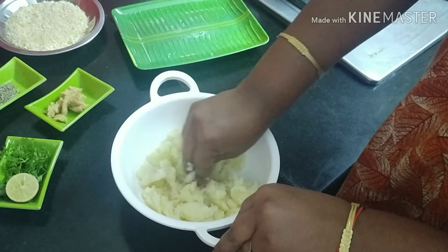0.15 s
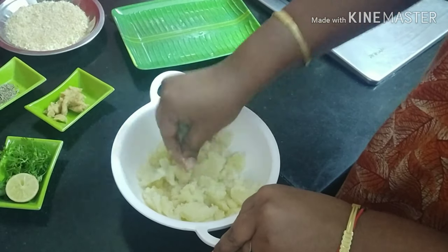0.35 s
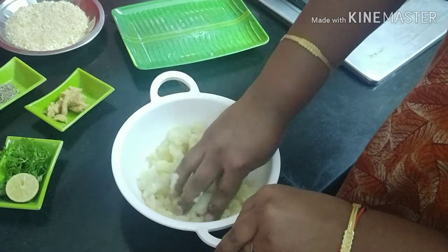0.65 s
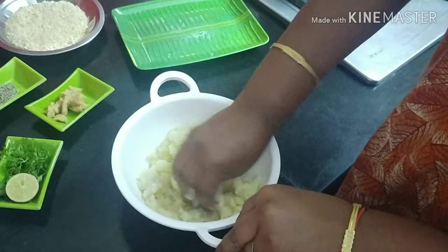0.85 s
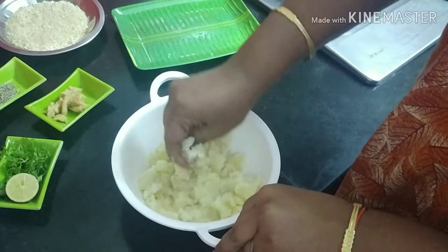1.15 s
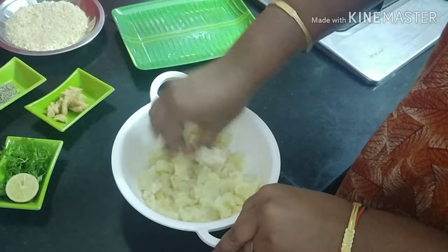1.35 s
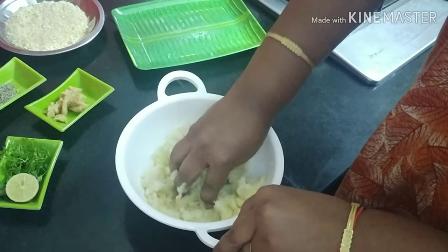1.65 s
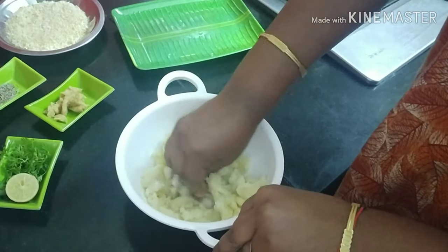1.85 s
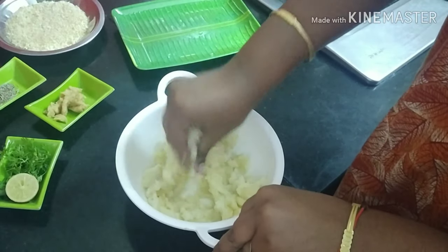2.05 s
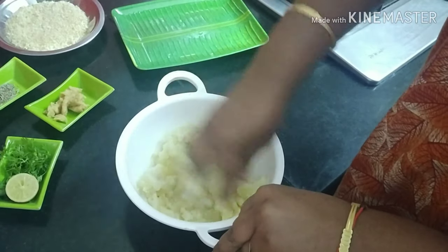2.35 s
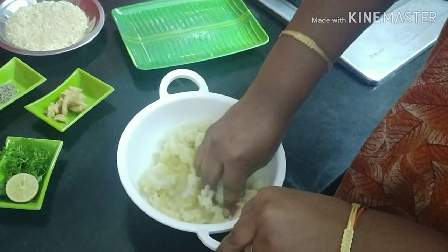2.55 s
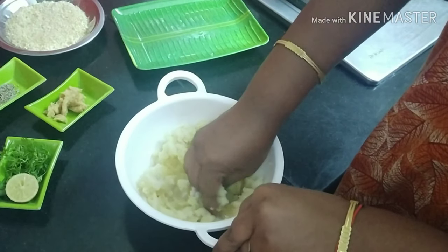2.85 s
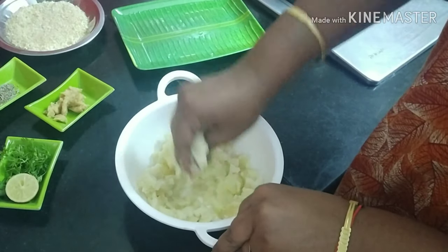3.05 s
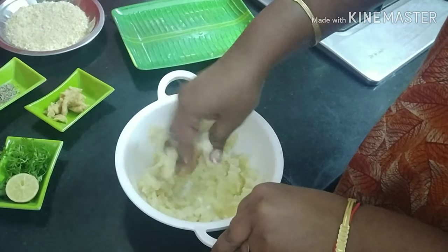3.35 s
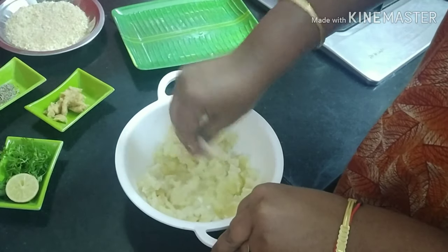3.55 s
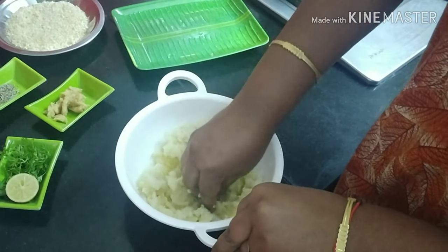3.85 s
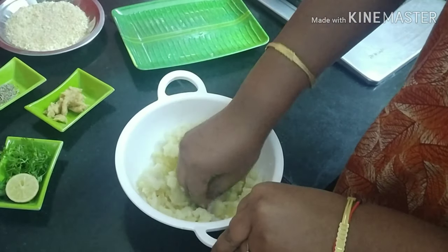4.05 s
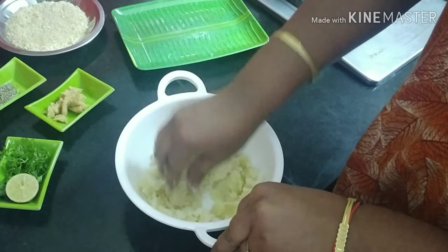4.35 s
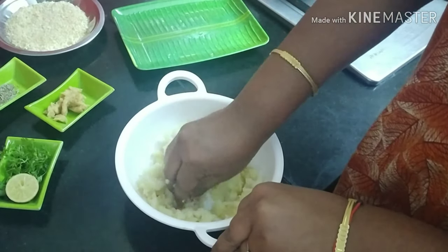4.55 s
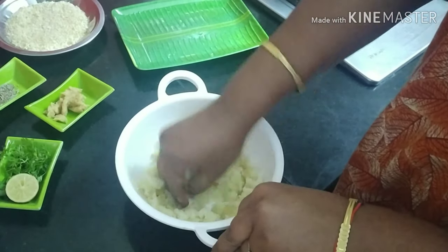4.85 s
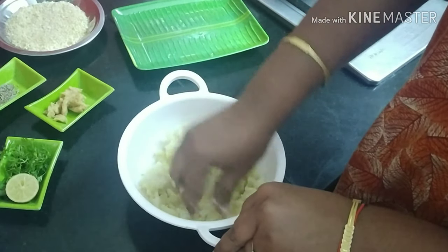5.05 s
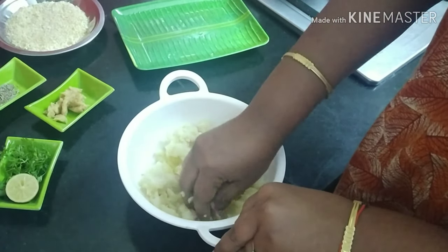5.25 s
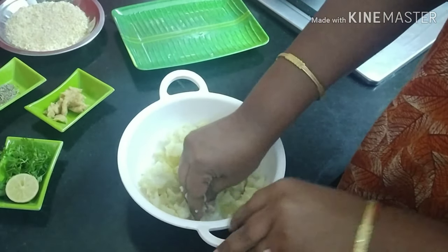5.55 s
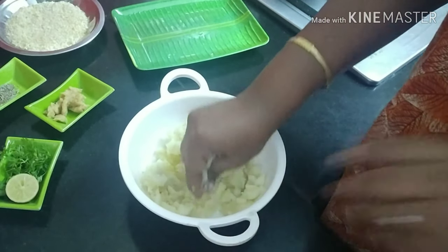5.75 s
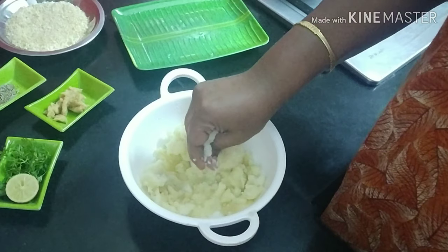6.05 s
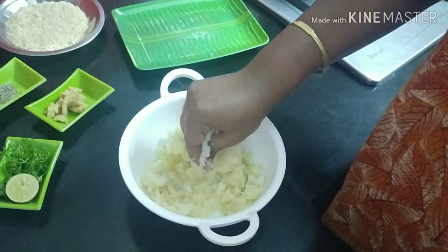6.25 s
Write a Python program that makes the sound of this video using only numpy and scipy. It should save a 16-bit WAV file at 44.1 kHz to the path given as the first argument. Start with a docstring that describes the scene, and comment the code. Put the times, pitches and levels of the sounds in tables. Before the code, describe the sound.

A close, quiet kitchen sound with short, hard reflections. From the start a hand mashes soft boiled potatoes in a plastic bowl: fine wet crackles, smeary slides and dull finger rubs come in uneven pulses, with a rub around 0.8 s and crisp sticky pops near 1.2 s. At 1.67 s the bowl knocks once, a sharp, hollow plastic crack, by far the loudest event, ringing briefly. A strong smear and pop follow at 1.9 s, with soft low bumps and a hum swell around 2 s. Squeezing continues, with smears at 3.1 and 3.8 s, a light tap at 3.9 s, and a bright pop and tick about 4.55 s. Tiny metallic bracelet clinks gather around 5.05 s. From 5.3 s it grows sparse, with a faint tap and tone, until small rubs and squeezes at 6.0-6.3 s. Low wavering hum, rumble and faint hiss persist underneath.

```python
"""Stone kitchen counter: a hand mashes soft boiled potatoes in a plastic bowl.
Squeezes and slides are coloured random clicks: wet crackle, paste smear, rub on plastic; noise bursts pop.
The bowl is tapped and knocks once: contact snap, noise crack, decaying modes. A bracelet clinks likewise.
A small hard room adds echoes and a tail; below lie faint tones, a wavering hum, low bumps and shaped noise."""
import sys
import numpy as np
from scipy import signal
from scipy.fft import rfft, irfft, next_fast_len
from scipy.io import wavfile

SR = 44100
rng = np.random.default_rng(int(sys.argv[2]) if len(sys.argv) > 2 else 0)


def dump_mix(stems):
    """Bounce the given channels to the path in sys.argv[1] as a 16-bit WAV at rate SR."""
    frames = np.atleast_2d(stems).T  # one column per channel
    limited = np.clip(frames, -1, 1)  # hard clip at full scale
    pcm = np.round(limited * 32767).astype(np.int16)
    wavfile.write(sys.argv[1], SR, pcm)


N = 281799
TIME = np.arange(N) / SR
TOP_HZ = 15700


def undb(db):
    """Decibels to amplitude gain."""
    return 10 ** (np.asarray(db) / 20)


def unit(x):
    """Scale to rms 1."""
    return x / np.sqrt(np.mean(x ** 2))


def at(points, hz):
    """Interpolate (frequency, value) points on a log-frequency axis."""
    point_hz, value = np.transpose(points)
    return np.interp(np.log(np.maximum(hz, 1)), np.log(point_hz), value)


def colour(x, points):
    """Filter x by a (frequency, level) curve, then scale to rms 1."""
    size = next_fast_len(len(x))
    gain = undb(at(points, np.fft.rfftfreq(size, 1 / SR)))
    return unit(irfft(rfft(x, size) * gain, size)[:len(x)])


def bell(hz, centre_hz, octaves):
    """Gaussian weight on a log-frequency axis; octaves is its standard deviation."""
    return np.exp(-.5 * (np.log2(np.maximum(hz, 1) / centre_hz) / octaves) ** 2)


def band(x, centre_hz, octaves):
    """Keep one bell-shaped band of x."""
    weight = bell(np.fft.rfftfreq(len(x), 1 / SR), centre_hz, octaves)
    return irfft(rfft(x) * weight, len(x))


def walk(knots_per_s):
    """Straight lines between random normal knots."""
    knots = rng.standard_normal(int(N / SR * knots_per_s) + 2)
    return np.interp(TIME * knots_per_s, np.arange(len(knots)), knots)


def add(out, start_s, sound):
    """Mix a sound in at a time."""
    i = max(int(start_s * SR), 0)
    out[i:i + len(sound)] += sound[:max(N - i, 0)]


def fade(t, t60_s):
    """Exponential decay, 60 dB per t60."""
    return np.exp(-np.log(1000) * t / t60_s)


def envelope(start_s, length_s, attack_s, t60_s):
    """Sine-squared rise, hold until the length is over, exponential decay."""
    t = TIME - start_s
    rise = np.sin(np.pi / 2 * np.clip(t / min(attack_s, length_s), 0, 1)) ** 2
    return rise * fade(np.maximum(t - length_s, 0), t60_s)


def ring(modes, t, centre_hz, octaves, share):
    """Struck modes weighted by the contact band; touch scales every t60 by share."""
    out = np.zeros(len(t))
    for k, (hz, db, t60_s) in enumerate(modes):
        gain = (-1) ** k * undb(db) * bell(hz, centre_hz, octaves)  # neighbours in opposite senses
        out += gain * fade(t, t60_s * share) * np.cos(2 * np.pi * hz * t + np.pi / 4)
    return out


def grains(per_s, spread_db):
    """Random clicks of either sign; levels vary exponentially by spread_db, capped at 4 spreads."""
    size = undb(spread_db * np.minimum(rng.exponential(size=N), 4))
    return (rng.random(N) < per_s / SR) * size * rng.choice([-1, 1], N)


def swells(rows):
    """Sines under a raised-cosine window."""
    out = np.zeros(N)
    for start_s, db, hz, length_s in rows:
        t = TIME[:int(length_s * SR)]
        add(out, start_s, undb(db) * np.hanning(len(t)) * np.sin(2 * np.pi * hz * t))
    return out


# fingers closing on the mash: (time [s], length [s], relative wet-crackle level [dB])
SQUEEZES = [(-.03, 0.028, -63), (0.092, 0.43, -74.5), (0.494, 0.49, -64), (1.048, 0.16, -68),
            (1.407, 0.43, -69), (1.769, 0.23, -68), (2.132, 0.12, -68.5), (2.326, 0.07, -64),
            (2.465, 0.12, -66), (2.673, 0.047, -70), (2.813, 0.24, -70.5), (3.0, 0.13, -65.5),
            (3.113, 0.089, -70.5), (3.452, 0.28, -69.5), (3.747, 0.14, -71.5), (3.853, 0.056, -62),
            (4.104, 0.37, -69), (4.517, 0.14, -64), (4.753, 0.24, -69), (5.101, 0.38, -74),
            (6.156, .1, -73.5), (6.298, 0.083, -63.5)]


def grip():
    """Squeeze envelopes, power-summed: quick closing, slower release."""
    power = np.zeros(N)
    for start_s, length_s, db in SQUEEZES:
        power += (undb(db) * envelope(start_s, length_s, attack_s=0.044, t60_s=.5)) ** 2
    return np.sqrt(power)


# hand sliding on the bowl wall:
# (time of hardest push [s], build-up [s], relative smear level [dB], relative rub level [dB])
SLIDES = [(.6, .12, -72, -76), (.77, 0.19, -66.5, -66.5), (.87, 0.093, -68, -75), (.98, 0.14, -64.5, -80),
          (1.2, .04, -72, -95), (1.93, .06, -60, -67.5), (3.07, 0.087, -59.5, -72), (3.8, 0.061, -61, -70),
          (3.91, 0.081, -66, -72), (4.181, 0.057, -82, -77), (4.6, 0.1, -67.5, -74), (4.67, 0.05, -71, -74),
          (4.9, 0.17, -68.5, -85), (6.05, .2, -87, -77), (6.19, 0.089, -86.5, -71.5),
          (6.34, 0.065, -68, -68)]
PASTE_FLOOR_DB = -80.5  # relative, as in the smear column


def slide():
    """Paste and plastic drag: each push builds to a peak and dies away over a constant floor."""
    paste, drag = undb(PASTE_FLOOR_DB), undb(PASTE_FLOOR_DB - 5.5)
    for peak_s, build_s, smear_db, rub_db in SLIDES:
        push = envelope(peak_s - build_s, build_s, build_s, t60_s=0.35)
        paste = np.hypot(paste, undb(smear_db) * push)
        drag = np.hypot(drag, undb(rub_db) * push)
    return paste, drag


# bursting wet films: (frequency [Hz], level [dB])
WET_COLOUR = [(1500, -24), (3200, -10.5), (5000, -2.5), (7000, -1), (10500, -1), (12500, -10),
              (15000, -5.5)]


def wet_crackle(squeeze):
    """Bursting films: dense clicks in irregular spurts, gated by the squeeze."""
    clicks = grains(per_s=4200, spread_db=3.5) * undb(3.9 * walk(60))
    return undb(-0.6) * colour(clicks, WET_COLOUR) * squeeze


# smearing paste: (frequency [Hz], level [dB])
SMEAR_COLOUR = [(900, -24), (1500, -11), (1900, -2), (2700, 0), (4200, -1), (6000, -6.5), (10000, -25)]


def paste_smear(squeeze, paste):
    """Paste shears under slides and, weaker, under squeezes: clicks in irregular spurts."""
    clicks = grains(per_s=1800, spread_db=2.5) * undb(3.3 * walk(60))
    return undb(-2.5) * colour(clicks, SMEAR_COLOUR) * np.hypot(paste, undb(-11) * squeeze)


# fingers on plastic: (frequency [Hz], level [dB])
RUB_COLOUR = [(600, -22), (950, -7), (1100, -0.5), (1300, -0.5), (1500, -10), (2200, -28.5)]


def plastic_rub(drag):
    """Fingers drag on the plastic: sparser clicks, few of them weaker than the rest."""
    return undb(-1.7) * colour(grains(per_s=620, spread_db=-1.0), RUB_COLOUR) * drag


def mash():
    """Squeezes and slides drive the wet crackle, smear and rub."""
    squeeze = grip()
    paste, drag = slide()
    return wet_crackle(squeeze) + paste_smear(squeeze, paste) + plastic_rub(drag)


# sticky pops as the mash parts: (time [s], relative peak level [dB], band centre [Hz])
POPS = [(0.416, -48, 8050), (.5093, -49, 9000), (0.5544, -50, 6300), (0.7036, -48.5, 6420),
        (0.832, -46, 4600), (0.8914, -44, 3480), (0.9733, -50, 4430), (1.198, -40, 7040),
        (1.1982, -43.5, 3130), (1.2305, -41.5, 9700), (1.4501, -50, 8700), (1.564, -44.5, 4950),
        (1.902, -49, 4100), (1.953, -34.5, 5520), (2.214, -45, 9980), (2.2676, -51, 8400),
        (2.335, -46, 8590), (2.3892, -42, 7300), (3.1223, -45, 7980), (3.1642, -49, 6500),
        (3.639, -46, 9010), (3.702, -42.5, 7500), (3.801, -41, 6850), (3.9138, -39, 7490),
        (4.2784, -44.5, 8150), (4.5452, -36, 10600), (5.3434, -52, 10070), (5.394, -53, 7000),
        (5.776, -55.5, 7520)]


def pops(t60_s=0.0095, octaves=0.47, fizz_db=-17, level_db=-4.0):
    """A parting film gives a band-passed noise snap and a trace of fizz."""
    out, t = np.zeros(N), TIME[:SR // 20]
    for start_s, db, hz in POPS:
        burst = rng.standard_normal(len(t)) * (fade(t, t60_s) + undb(fizz_db) * fade(t, .05))
        edges_hz = np.clip([hz / 2 ** octaves, hz * 2 ** octaves], 100, TOP_HZ)
        snap = signal.sosfilt(signal.butter(2, edges_hz, "bandpass", fs=SR, output="sos"), burst)
        add(out, start_s, undb(db + level_db) * snap / np.abs(snap).max())
    return out


# loaded bowl's modes: (frequency [Hz], level [dB], t60 [s])
BOWL_MODES = [(234, -17, 0.31), (307, -16.5, 0.33), (449, -16.5, 0.44), (508, -4.5, 0.15),
              (601.5, -18.5, 0.34), (705, -7.5, 0.2), (749, -11, 0.31), (798.5, -12, 0.25),
              (1050, -3.5, .2), (1115, -3, 0.22), (1194, -6, 0.19), (1300, -3, .14), (1373, -13, 0.18),
              (1790, -9.5, 0.047), (2018, -16.5, 0.049), (2096, -13.5, 0.051), (2560, -7, 0.09),
              (2665, -14.5, .12), (2720, -7, 0.07), (3180, -8, 0.045), (3483, -12.5, .07),
              (3988, -16.5, 0.22), (4094, -16, 0.17), (4216, -15, .06), (4570, -11, .06),
              (5453, -12, 0.042)]
# crack of plastic: (frequency [Hz], level [dB])
CRACK_COLOUR = [(90, -25), (240, -8), (720, -5.5), (1250, 2.5), (1600, -4.5), (2200, 1), (2650, -5),
                (4200, 2), (5700, 0), (7000, -3), (8000, -9.5), (9800, -9.5), (12000, -27.5), (15000, -34)]
# hollow of the bowl and counter under it: (frequency [Hz], level [dB])
HOLLOW_COLOUR = [(100, -27.5), (260, -8), (370, -20.5), (500, -8), (640, -5), (760, 13), (920, -4),
                 (1100, -1.5), (1320, -5), (1600, -25), (4000, -38.5), (7000, -35.5), (12000, -56)]
# blows on the bowl: (time [s], level [dB], contact band centre [Hz], band spread [octaves],
# share of the t60 left by the hand [0-1])
BLOWS = [(1.6627, -48, 901, 0.6, 0.14), (1.6666, -18.5, 1530, 2.75, 0.71),
         (1.6685, -23.5, 3740, 1.03, 0.26), (1.8338, -49, 3700, 0.42, 0.5), (3.8972, -42, 2500, 0.72, 0.08),
         (3.9036, -41, 2250, 0.19, 0.3), (4.5576, -38, 1850, 0.22, 1.0), (4.561, -48.5, 4400, .2, 0.8),
         (5.289, -53.5, 2700, 0.34, 0.67)]


def bowl(crack_db=0.5, crack_t60_s=0.031, hollow_db=-10, hollow_t60_s=0.38,
         snap_db=13.5, snap_hz=2700, snap_t60_s=0.0026):
    """Knock and finger taps: contact snap, short plastic crack, modes, dense hollow after-ring."""
    out, t = np.zeros(N), TIME[:SR // 2]
    for start_s, db, hz, octaves, share in BLOWS:
        pulse = np.sin(2 * np.pi * snap_hz * t) * fade(t, snap_t60_s)
        snap = undb(snap_db) * band(pulse, hz, octaves) * fade(t, crack_t60_s)
        crack = band(colour(rng.standard_normal(len(t)), CRACK_COLOUR), hz, octaves)
        crack = undb(crack_db) * crack * fade(t, crack_t60_s)
        hollow = band(colour(rng.standard_normal(len(t)), HOLLOW_COLOUR), hz, octaves)
        hollow = undb(hollow_db) * hollow * fade(t, hollow_t60_s * share)
        modes = ring(BOWL_MODES, t, hz, octaves, share) * (1 - fade(t, .0005))  # soft onset
        add(out, start_s, undb(db) * (snap + modes + crack + hollow))
    return out


# bracelet's modes: (frequency [Hz], level [dB], t60 [s])
BRACELET_MODES = [(3530, -9.5, 0.13), (5730, -1, 0.082), (8250, -12, 0.033), (8390, -4.5, 0.051),
                  (9400, -8, 0.029), (11310, -3, 0.1), (12400, -13, .05), (14760, -5, .06),
                  (15080, -1, .035)]
# clinks: (time [s], level [dB], contact band centre [Hz], band spread [octaves],
# share of the t60 left by the skin [0-1])
CLINKS = [(4.539, -52, 10000, .25, 0.04), (4.809, -51.5, 12440, 0.056, .8), (4.915, -60, 13000, .8, .6),
          (4.987, -60, 12500, 0.78, .6), (5.025, -49, 3510, .04, 0.9), (5.0493, -44, 6160, 0.94, 0.47),
          (5.0732, -38, 12400, 0.85, 0.44), (5.1437, -51, 14000, 0.31, 0.12)]


def bracelet():
    """Small metal links touch: noise tick plus bright, brief modes."""
    out, t = np.zeros(N), TIME[:SR // 4]
    for start_s, db, hz, octaves, share in CLINKS:
        tick = undb(2.0) * band(rng.standard_normal(len(t)), hz, octaves) * fade(t, 0.008)
        add(out, start_s, undb(db) * (ring(BRACELET_MODES, t, hz, octaves, share) + tick))
    return out


# faint tones: (time [s], level before flicker [dB], frequency [Hz], length [s])
TONES = [(2.64, -72, 602, 0.14), (3.17, -77.5, 718, 0.24), (3.84, -75.5, 497, 0.28), (4.08, -65, 480, 0.24),
         (4.2, -76.5, 612, 0.19), (5.42, -66.5, 482, 0.16)]


def tones():
    """Faint sines come and go, their level flickering at random."""
    return swells(TONES) * undb(5.5 * walk(76))


# first reflections off the counter and things on it: (delay [s], level [dB])
ECHOES = [(.0033, -17), (.0052, -16.5), (.0094, -18), (0.014, -28.5), (.0196, -18.5), (.0233, -26)]
# room decay: (frequency [Hz], t60 [s])
ROOM_T60 = [(200, 0.61), (800, 0.36), (3000, 0.23), (8000, .24), (15000, .15)]


def room(x, wet_db=-9):
    """Quick reflections, then a noise tail that dies sooner in the treble."""
    t = TIME[:SR // 2]
    noise = rng.standard_normal(len(t))
    tail = sum(band(noise, hz, .45) * fade(t, at(ROOM_T60, hz)) for hz in 125 * 2 ** np.arange(8))
    tail = tail * (1 - fade(t, 0.028))  # gradual onset
    tail = tail / np.linalg.norm(tail)
    early = sum(undb(db) * np.interp(TIME - delay_s, TIME, x, left=0) for delay_s, db in ECHOES)
    return x + early + undb(wet_db) * signal.fftconvolve(x, tail)[:N]


# hum swells: (time [s], length [s], level [dB])
HUM_SWELLS = [(1.036, 0.12, -57.5), (2.067, 0.28, -46), (2.54, 0.26, -62), (3.324, 0.31, -63.5),
              (4.019, 0.14, -58), (5.97, 0.077, -57), (6.203, 0.09, -59)]
HUM_HZ, HUM_DB, HUM_WAVER_PER_S = 88.2, -66, 15


def hum():
    """Low tone, unsteady in pitch and level; its swells carry a weak octave."""
    phase = 2 * np.pi * np.cumsum(HUM_HZ * (1 + .012 * walk(25))) / SR
    in_phase = walk(HUM_WAVER_PER_S) * np.sin(phase)
    quadrature = walk(HUM_WAVER_PER_S) * np.cos(phase)
    steady = undb(HUM_DB) * (in_phase + quadrature)
    swell = np.zeros(N)
    for start_s, length_s, db in HUM_SWELLS:
        swell += undb(db) * envelope(start_s, length_s, attack_s=.09, t60_s=0.62)
    tone = np.sin(phase) + undb(-27.5) * np.sin(2 * phase)
    return steady + np.sqrt(2) * swell * tone  # sine rms to peak


# soft low bumps: (time [s], level [dB], frequency [Hz], length [s])
BUMPS = [(1.665, -47, 124, 0.037), (1.668, -45, 206, 0.02), (1.972, -41.5, 42.5, 0.063),
         (2.0, -42, 82.6, 0.037), (2.025, -43, 57, 0.053), (4.555, -62.5, 351, 0.031),
         (5.275, -59, 249, 0.038)]


def bumps():
    """Soft low thuds: very short windowed sines."""
    return swells(BUMPS)


# background spectrum: (frequency [Hz], relative level [dB per Hz])
KITCHEN_COLOUR = [(8, -12.5), (22, 4), (34, -7.5), (55, -15.5), (100, -15), (150, -21.5), (190, -21),
                  (300, -30), (600, -31), (1000, -35.5), (1600, -40), (2600, -40.5), (5000, -49.5),
                  (8000, -49), (15500, -47.5)]
KITCHEN_RMS_DB = -56.5


def kitchen():
    """Rumble and faint hiss from shaped noise; the middle octaves drift in level."""
    air = rng.standard_normal(N)
    for hz in 200 * 2 ** np.arange(4):
        air = air + band(air, hz, .4) * (undb(2.2 * walk(6.9)) - 1)
    return undb(KITCHEN_RMS_DB) * colour(air, KITCHEN_COLOUR)


def scene():
    """Hand, bowl, bracelet and tones sound in the room; hum, bumps and background are added dry."""
    near = mash() + pops() + bowl() + bracelet()
    return (room(near + tones()) + hum() + bumps() + kitchen())[None]


def record(dry):
    """Steep elliptic low-pass at TOP_HZ."""
    return signal.sosfilt(signal.ellip(10, .2, 70, TOP_HZ, fs=SR, output="sos"), dry)


dry = scene()
out = record(dry)
dump_mix(out)
```